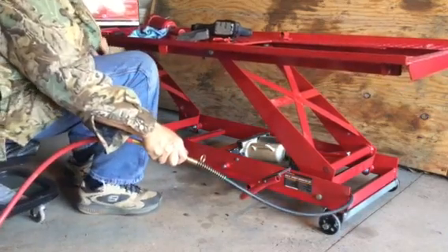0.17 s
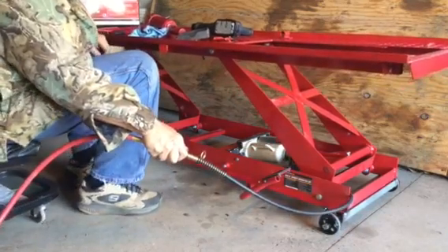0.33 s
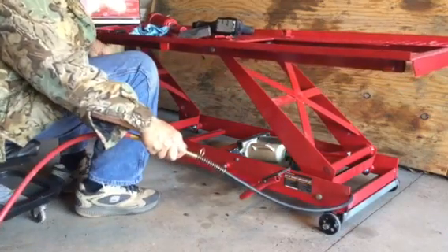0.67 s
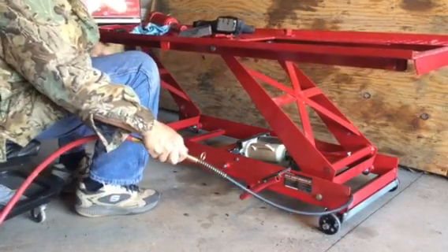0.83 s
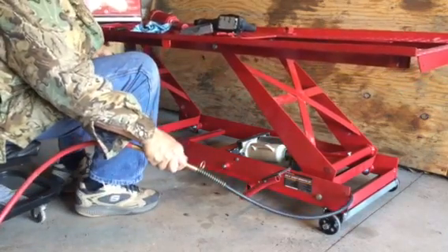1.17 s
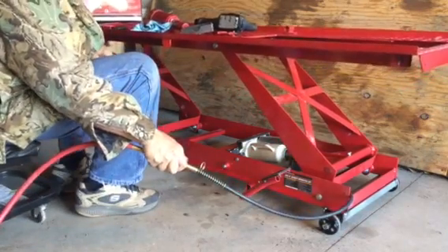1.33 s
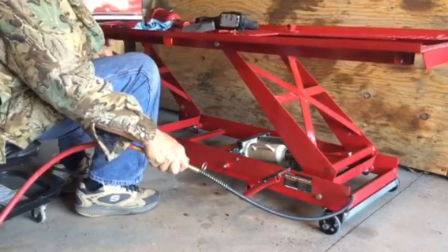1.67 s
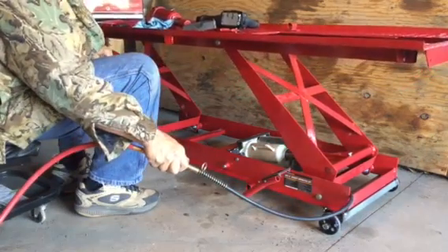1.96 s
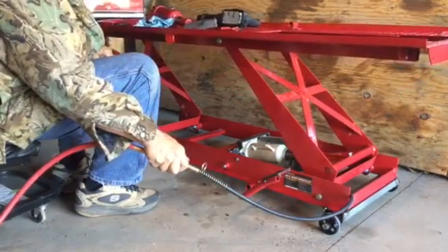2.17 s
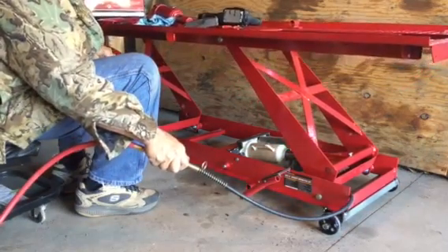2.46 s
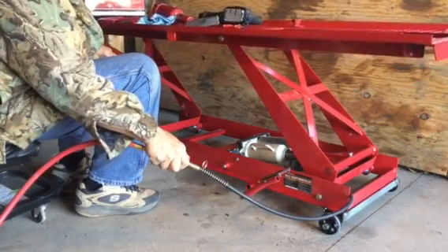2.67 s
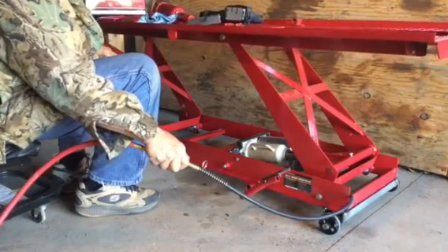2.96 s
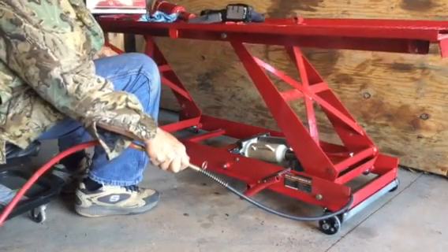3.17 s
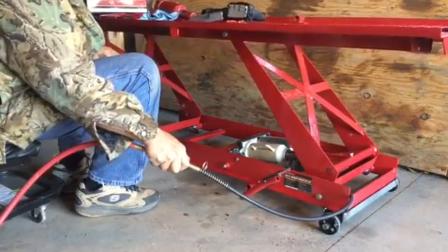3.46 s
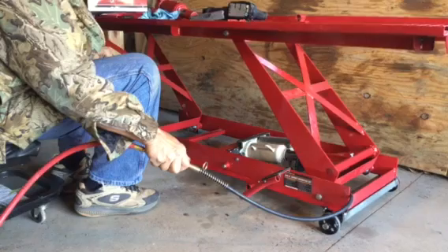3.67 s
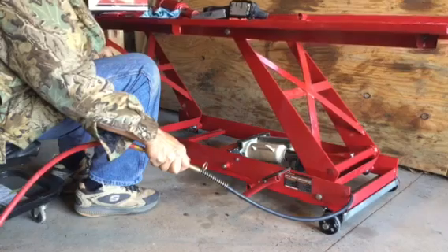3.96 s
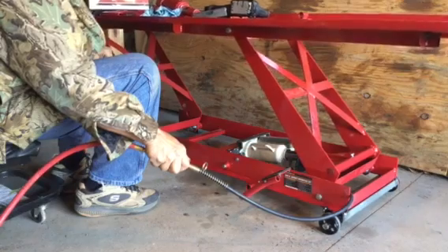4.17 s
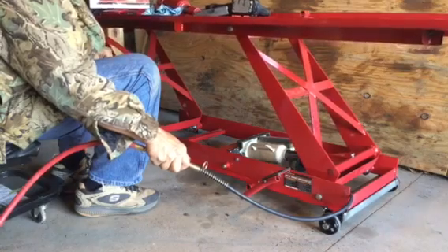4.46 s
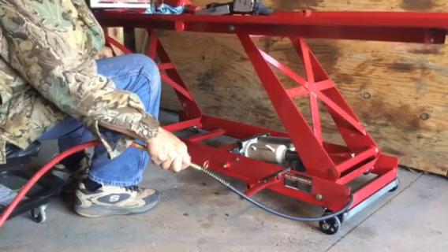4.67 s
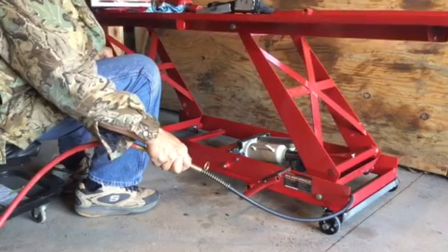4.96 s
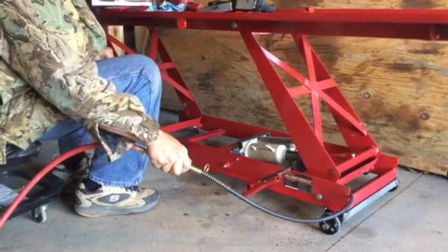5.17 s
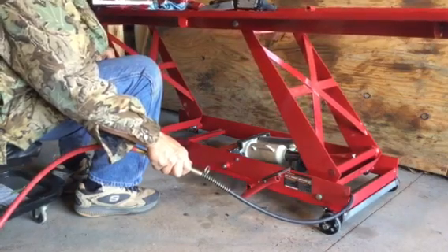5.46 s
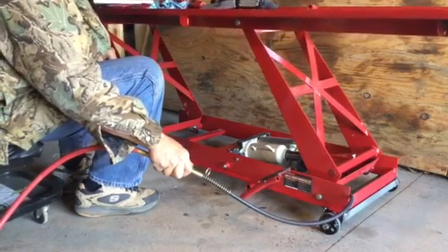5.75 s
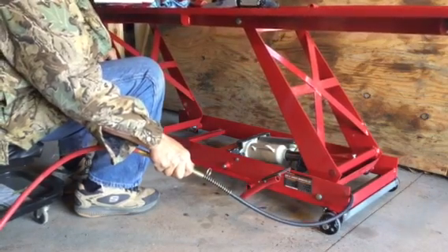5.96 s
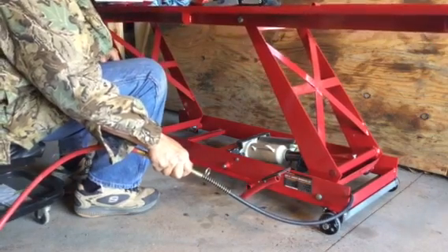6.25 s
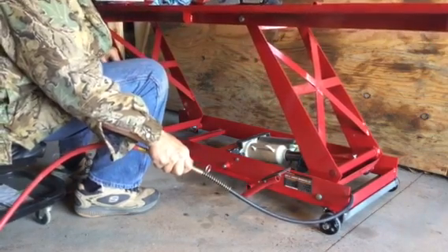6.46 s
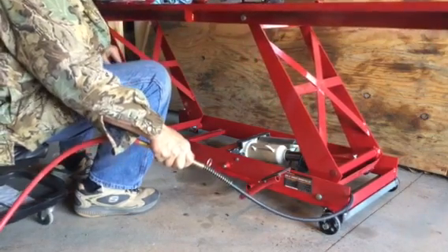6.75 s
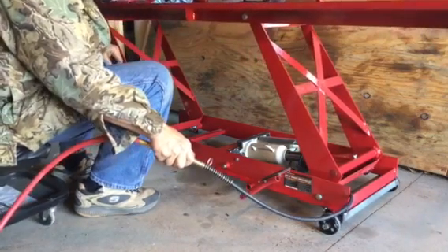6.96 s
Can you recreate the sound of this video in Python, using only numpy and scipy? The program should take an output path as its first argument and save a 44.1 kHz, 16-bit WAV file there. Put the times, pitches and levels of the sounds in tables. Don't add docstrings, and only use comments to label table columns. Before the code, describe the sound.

Fast mechanical chatter from start to finish: a hiss of compressed air just before each sharp clack, then a brief clattering bounce, repeated like a small machine gun and slowing almost imperceptibly. Thin steel rings and occasional deeper bumps come from the loaded lift. Short garage reflections blur the strokes together over a low, steady hum. Mono, near the pump, with little deep bass.

```python
import sys
import numpy as np
from scipy import signal
from scipy.fft import rfft, irfft
from scipy.io import wavfile
from scipy.ndimage import uniform_filter1d

SR = 44100
rng = np.random.default_rng(int(sys.argv[2]) if len(sys.argv) > 2 else 0)


def dump_mix(stems):
    frames = np.atleast_2d(stems).T
    limited = np.clip(frames, -1, 1)
    pcm = np.round(limited * 32767).astype(np.int16)
    wavfile.write(sys.argv[1], SR, pcm)


def gain_from_decibels(decibels):
    exponent = np.asarray(decibels, float) / 20
    return 10 ** exponent


N = 313110

# stroke_number, slam_s
STROKE_PACE = [(0, .0192), (8, .7419), (15, 1.3749), (23, 2.0993), (29, 2.642), (34, 3.0949), (40, 3.6389),
               (46, 4.1821), (53, 4.8168), (66, 5.9949), (78, 7.0835)]
# time_s, into_frame_db, into_body_db
SLAM_FORCE = [(0, -32, -35.5), (.6, -31.5, -36), (1.0, -33.5, -35.5), (1.9, -32.5, -34), (2.65, -31, -35),
              (3.2, -30, -34), (3.7, -30, -34), (4.6, -31, -34.5), (5.3, -28.5, -32.7), (6.3, -29.5, -33),
              (7.1, -29, -33.5)]
# delay_s, into_frame_db, into_body_db
SLAM_CONTACTS = [
    (-.0018, -9, 0),
    (.0004, 0, -14),
    (.0055, -13, -10),
    (.009, -8, -12),
    (.015, -13, -13),
    (.0225, -13, -14),
    (.029, -15, -18),
    (.048, -21, -27),
]
# pitch_hz, lift_low_db, lift_high_db, t60_s
FRAME_MODES = [(1142, -11.5, -18.5, 0.026), (1277, -8.5, -18, 0.024), (1522, -17, -18, 0.015),
               (1685, -11, -19.5, 0.043), (1974, -11.5, -5, 0.018), (2137, 1.5, -2.5, 0.011),
               (2189, -11.5, -6.5, 0.012), (2350, -6.5, -3, 0.01), (2405, -13, -12, 0.011)]
# pitch_hz, lift_low_db, lift_high_db, t60_s
BODY_MODES = [(2796, -12, -22, 0.021), (3200, -7, -1.5, 0.012), (3375, -3, -7.5, 0.0073),
              (3490, -4.5, -5, 0.01), (3622, -5, -13, 0.011), (4154, -22.5, -16.5, 0.015),
              (5660, -19, -19, 0.023), (5930, -6.5, -14, 0.012), (8360, -9, -8, 0.0049),
              (9030, -11, -1, 0.0059), (9540, -4.5, -9, 0.0076), (12530, -1, -2.5, .005)]
# pitch_hz, lift_low_db, lift_high_db, t60_s
BAR_MODES = [(1310, -25, -24, 0.45), (1352, -17, -16.5, 0.24), (1418, -16.5, -20.5, 0.28),
             (1564, -24, -27, 0.21), (1670, -18.5, -28, 0.21), (1960, -23, -10.5, 0.2),
             (2114, -43, -6, 0.038), (2213, -12, -25, 0.16), (2164, -27, -22, 0.091),
             (2408, -0.5, -18.5, 0.068), (3340, -13, -11, 0.036), (3530, -19, -30.5, 0.19)]
# pitch_hz, width_hz
CANCELLED_BANDS = [(960, 350), (1800, 400)]
# time_from_slam_s, level_db
EXHAUST_PUFF = [
    (-.046, -6),
    (-.034, -12),
    (-.028, -11.5),
    (-.021, 0),
    (-.002, 1.5),
    (.008, 2),
    (.025, -3),
    (.046, -10.5),
]
# pitch_hz, level_db (per Hz)
JET_SPECTRUM = [(590, -43), (1000, -13), (1430, -4.5), (2160, -4.5), (3040, -4.5), (4290, -8.5),
                (5850, -5.5), (6630, -5.5), (7190, -5.5), (10000, -1), (11900, 1.5), (14600, 2),
                (15500, -12.5)]
# time_s, slam_thump_louder_db, next_pop_louder_db
LIFT_LURCHES = [(.11, 16, -7), (.20, 16.5, 0), (.29, 16, 1), (.38, 0, 12), (.47, 5, 14), (.83, 14, -2),
                (.92, 12, -2), (1.01, 13, 0), (1.10, 3, 9), (1.56, 15, 14), (2.01, 14.5, 15),
                (2.37, 11, 14), (2.64, 15, 2), (2.73, 2, 13), (3.09, 9, 10), (3.46, 13, -2), (3.55, 12, 9),
                (4.00, 10, 5), (4.09, 9, 1), (4.45, 16, 12), (4.54, -4, 9), (4.91, 17, 15), (5.36, 16, 13),
                (5.81, 17.5, 13), (6.18, 17, 5), (6.45, 0, 11), (6.54, -3, 9), (6.81, 15, 13)]
# pitch_hz, level_db, t60_s, strongest_at_s, spread_s
PLATFORM_MODES = [(384, -45.5, 0.31, 3.6, 1.1), (822, -47.5, .2, 5.75, 0.97), (482.4, -54, 0.36, 4.1, 1.5),
                  (319.3, -56, 0.36, 4.1, 1.1), (190, -46, 0.072, 0.95, 1.0), (200, -36, 0.074, 6.1, 1.4)]
# pitch_hz, from_pop_db, from_slam_db, t60_s
LOW_ROOM_MODES = [(55.4, -28, -0.5, 0.63), (87.5, -3, -6.5, 0.6), (99.2, -0.5, -21, 0.53),
                  (133.1, -15.5, 4.5, 0.61), (166, -13, -8.5, 0.8), (218.1, -12, -8.5, 1),
                  (291.7, -10.5, 4.5, 0.59), (392.2, -5.5, -7, 0.6), (469.8, -10.5, -1, 0.39),
                  (528, -35, -11.5, 0.022)]
# pitch_hz, level_db (per Hz)
RUMBLE_SPECTRUM = [(24, -37), (40, -16), (118, -0.5), (214, -6), (293, -8.5), (419, -18.5), (469, -10),
                   (942, -16), (1200, -20), (1560, -11), (2640, -120)]

VALVE_LEAD_S, THUMP_LAG_S = .0185, 0.003626


def strokes():
    number, at_s = np.transpose(STROKE_PACE)
    slam_s = np.interp(np.arange(number[-1] + 1), number, at_s)
    time_s, frame_db, body_db = np.transpose(SLAM_FORCE)
    return slam_s, np.interp(slam_s, time_s, frame_db), np.interp(slam_s, time_s, body_db)


def train(times_s, sizes):
    at = np.round(np.asarray(times_s) * SR).astype(int)
    inside = (at >= 0) & (at < N)
    return np.bincount(at[inside], (sizes * np.ones(len(at)))[inside], N)


def ring(clicks, hz, t60_s):
    radius = gain_from_decibels(-60 / (t60_s * SR))
    turn = 2 * np.pi * hz / SR
    feedback = [1, -2 * radius * np.cos(turn), radius * radius]
    return signal.lfilter([0, np.sin(turn)], feedback, clicks + 1e-18)


def swell(clicks, hz, t60_s):
    twice = ring(ring(clicks, hz, t60_s), hz, t60_s)
    return twice * 2 * np.e * np.log(1000) / (t60_s * SR)


def wander(shape, memory):
    keep = np.clip(memory, 0, .98)
    chance = rng.standard_normal((shape[0] + 30, shape[1]))
    return signal.lfilter([np.sqrt(1 - keep ** 2)], [1, -keep], chance, axis=0)[30:]


def steel(slam_s, blow_db, modes, response, column, drift_db, scatter_db):
    contacts = np.array(SLAM_CONTACTS)
    height = slam_s * SR / N
    out = np.zeros(N)
    for hz, low_db, high_db, t60_s in modes:
        path_s = rng.uniform(0, .0012, len(contacts))
        polarity = rng.choice([-1, 1], len(contacts))
        path_s[1], polarity[1] = .0008, 1
        times_s = slam_s[:, None] + contacts[:, 0] + path_s
        change_db = drift_db * wander(times_s.shape, memory=0.8)
        change_db += scatter_db * rng.standard_normal(times_s.shape)
        mode_db = blow_db + low_db + (high_db - low_db) * height
        level_db = mode_db[:, None] + contacts[:, column] + change_db
        clicks = train(times_s.ravel(), (polarity * gain_from_decibels(level_db)).ravel())
        out += response(clicks, hz, t60_s)
    return out


def crack(slam_s, blow_db):
    level_db = blow_db - 4 - 15 * slam_s * SR / N + rng.normal(0, 1.5, len(slam_s))
    return swell(train(slam_s - 0.00148, gain_from_decibels(level_db)), hz=1296, t60_s=0.0036)


def hollowed(x):
    x = signal.sosfilt(signal.butter(4, 1080, "high", fs=SR, output="sos"), x)
    for hz, width_hz in CANCELLED_BANDS:
        x = signal.lfilter(*signal.iirnotch(hz, hz / width_hz, SR), x)
    return x


def coloured(spectrum):
    hz, db = np.transpose(spectrum)
    grid_hz = np.maximum(np.arange(N // 2 + 1) * SR / N, 1)
    shape = gain_from_decibels(np.interp(np.log(grid_hz), np.log(hz), db))
    noise = irfft(rfft(rng.standard_normal(N)) * shape, N)
    return noise / noise.std()


def exhaust(slam_s, flicker_db):
    jet_db = np.linspace(-33, -33.5, len(slam_s)) + 0.43 * rng.standard_normal(len(slam_s))
    t = np.arange(N) / SR
    phase_s, puff_db = np.transpose(EXHAUST_PUFF)
    nearest = np.searchsorted((slam_s[1:] + slam_s[:-1]) / 2, t)
    gate_db = np.interp(t - slam_s[nearest], phase_s, puff_db) + jet_db[nearest]
    flicker = uniform_filter1d(rng.standard_normal(N), size=150) * np.sqrt(150)
    level_db = uniform_filter1d(gate_db, size=60) + flicker_db * flicker
    return gain_from_decibels(level_db) * coloured(JET_SPECTRUM)


def under_deck(x):
    at = np.arange(N)
    delay_s = np.linspace(.0009, .0021, N)
    return x + gain_from_decibels(-13.5) * np.interp(at - SR * delay_s, at, x)


def thinned(x):
    depth = np.clip(np.linspace(.2, 1.6, N), 0, 1)
    hollow = x
    for hz in (2610, 2770):
        hollow = signal.lfilter(*signal.iirnotch(hz, hz / 108, SR), hollow)
    return x + depth * (hollow - x)


def push(times_s, level_db, hz, t60_s):
    return -ring(train(times_s, gain_from_decibels(level_db)), hz, t60_s)


def lurches(slam_s):
    time_s, harder_db, next_db = np.transpose(LIFT_LURCHES)
    stroke = np.abs(time_s[:, None] - slam_s).argmin(axis=1)
    thump_db, pop_db = 3 * rng.standard_normal((len(slam_s), 2)).T
    thump_db[stroke] = harder_db
    pop_db[stroke + 1] = next_db
    thump = push(slam_s + THUMP_LAG_S, thump_db - 42, hz=84, t60_s=0.049)
    pop = push(slam_s - VALVE_LEAD_S, pop_db - 39.5, hz=92.5, t60_s=0.045)
    return thump + pop


def platform(slam_s):
    out = np.zeros(N)
    for hz, db, t60_s, at_s, spread_s in PLATFORM_MODES:
        off_height_db = -2.7 * ((slam_s - at_s) / spread_s) ** 2
        level_db = db + off_height_db + rng.normal(0, 2.3, len(slam_s))
        out += ring(train(slam_s + THUMP_LAG_S, gain_from_decibels(level_db)), hz, t60_s)
    return out


def knock(slam_s, level_db):
    clicks = train(slam_s - VALVE_LEAD_S, 0.74) + train(slam_s + THUMP_LAG_S, 0.81)
    clicks = clicks * gain_from_decibels(np.linspace(1.5, -3, N))
    dull = signal.sosfilt(signal.butter(2, [140, 560], "band", fs=SR, output="sos"), clicks)
    return gain_from_decibels(level_db) * garage(dull, t60_s=0.69, count=4)


def hum(slam_s, level_db):
    earlier_s = slam_s[0] - (slam_s[1] - slam_s[0]) * np.arange(6, 0, -1)
    lead_s = slam_s[0] - earlier_s[0]
    times_s = np.r_[earlier_s, slam_s] + lead_s
    size = N + round(lead_s * SR)

    def clicks(at_s, scatter_db):
        sizes = gain_from_decibels(rng.normal(0, scatter_db, len(at_s)))
        return np.bincount(np.round(at_s * SR).astype(int), sizes, size + SR)[:size]

    pop = clicks(np.maximum(times_s - VALVE_LEAD_S, 0), 1.1)
    slam = clicks(times_s + THUMP_LAG_S, 0.5)
    out = np.zeros(size)
    for hz, pop_db, slam_db, t60_s in LOW_ROOM_MODES:
        out -= ring(gain_from_decibels(pop_db) * pop + gain_from_decibels(slam_db) * slam, hz, t60_s)
    return gain_from_decibels(level_db) * out[-N:]


def garage(x, t60_s, count):
    t = np.arange(SR // 2) / SR
    place = np.linspace(0, count - 1, N)
    fade = gain_from_decibels(-60 * t / t60_s) * np.clip(t / 0.02, 0, 1)
    walls = signal.butter(1, 16100, fs=SR)
    out = np.zeros(N)
    for k, noise in enumerate(rng.standard_normal((count, len(t)))):
        tail = signal.lfilter(*walls, noise * fade)
        share = np.cos(np.pi / 2 * np.clip(place - k, -1, 1))
        out += signal.oaconvolve(share * x, tail / np.sqrt(np.sum(tail ** 2)))[:N]
    return out


def rumble(level_db):
    return gain_from_decibels(level_db) * coloured(RUMBLE_SPECTRUM)


def scene():
    slam_s, frame_db, body_db = strokes()
    clang = steel(slam_s, frame_db + 7.0, FRAME_MODES, swell, column=1, drift_db=3.36, scatter_db=1.95)
    tick = steel(slam_s, body_db + 7.5, BODY_MODES, swell, column=2, drift_db=1.55, scatter_db=2.03)
    bars = steel(slam_s, frame_db + 8.0, BAR_MODES, ring, column=1, drift_db=4.5, scatter_db=1.5)
    air = under_deck(exhaust(slam_s, flicker_db=-0.7))
    reflected = garage(gain_from_decibels(-7) * clang + gain_from_decibels(-8) * tick + gain_from_decibels(-16) * air, t60_s=0.53, count=9)
    metal = hollowed(clang + tick + bars + crack(slam_s, body_db) + reflected)
    load_shift = push([.113], -24.5, hz=200, t60_s=0.045)
    low = lurches(slam_s) + load_shift + platform(slam_s)
    low += knock(slam_s, level_db=1.0) + hum(slam_s, level_db=-48.0) + rumble(level_db=-48.5)
    return (thinned(metal + air) + low)[None]


def roll_off(x):
    return signal.sosfilt(signal.butter(12, 16050, fs=SR, output="sos"), x)


def record(dry):
    bassless = signal.sosfilt(signal.butter(6, 50, "high", fs=SR, output="sos"), dry)
    topless = signal.sosfilt(signal.cheby2(22, 70, 15860, fs=SR, output="sos"), bassless)
    return roll_off(topless)


dry = scene()
out = record(dry)
dump_mix(out)
```